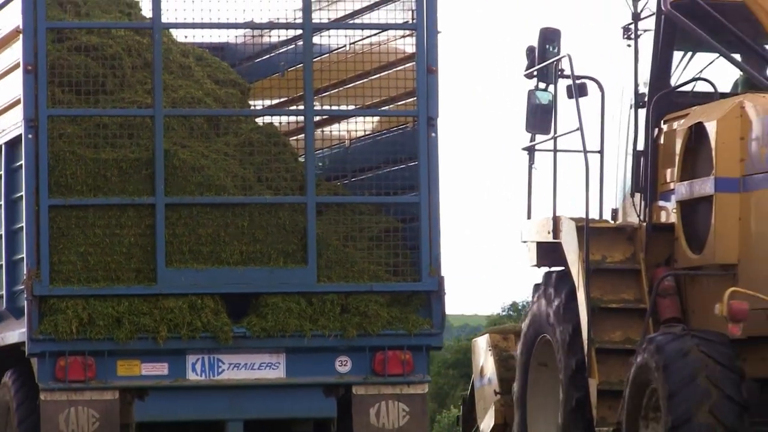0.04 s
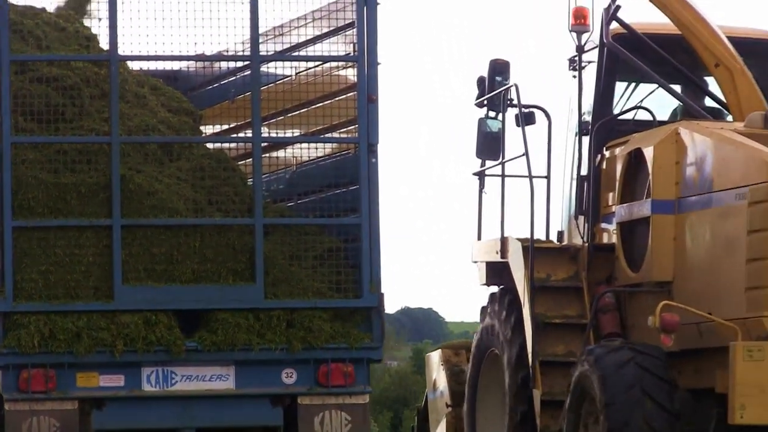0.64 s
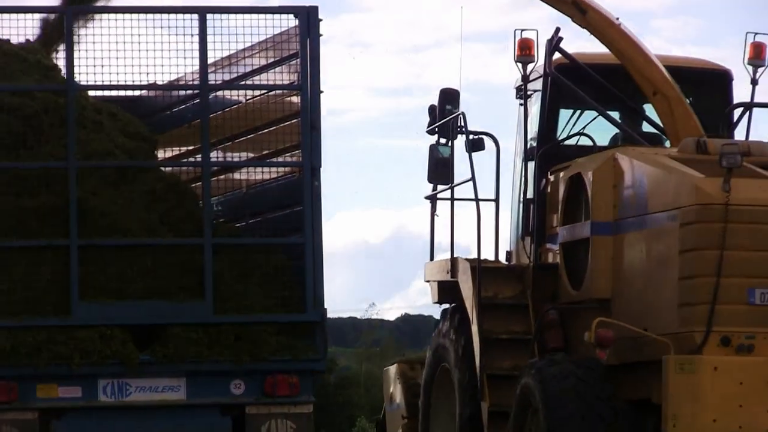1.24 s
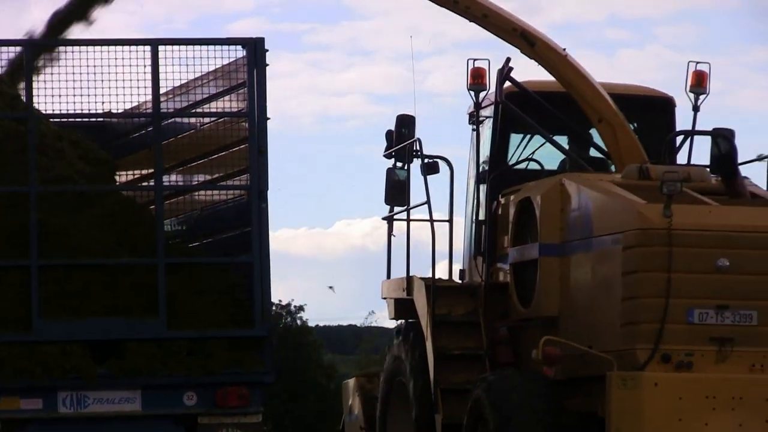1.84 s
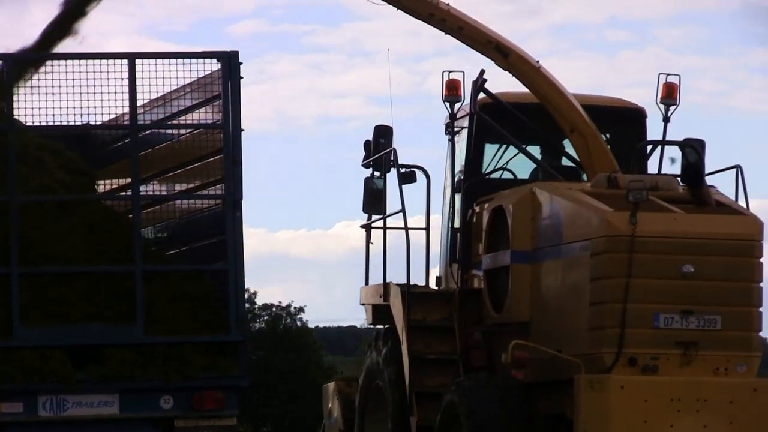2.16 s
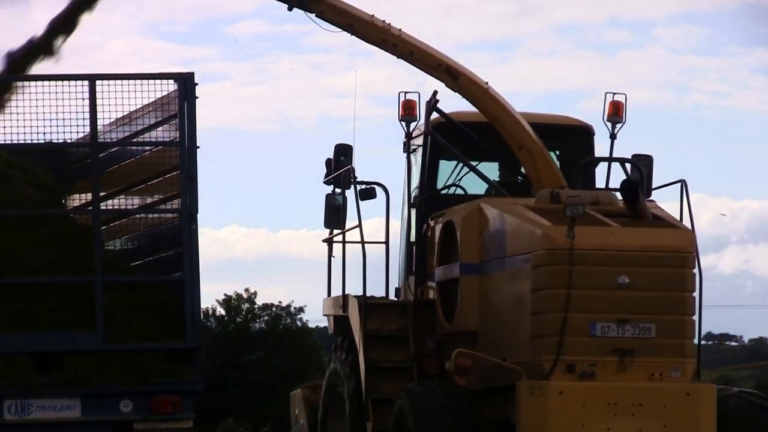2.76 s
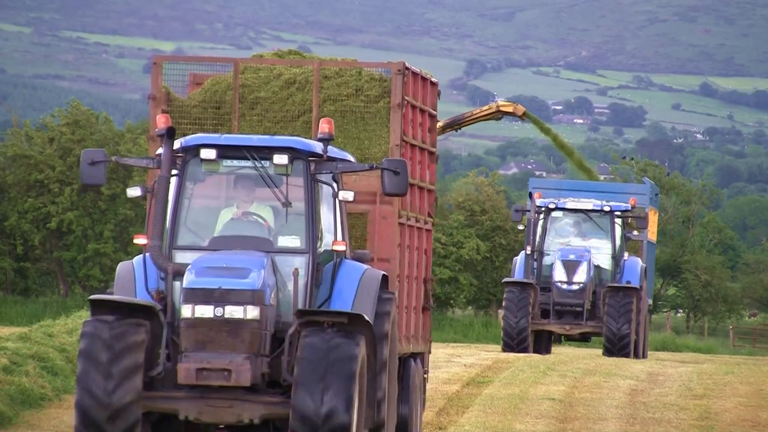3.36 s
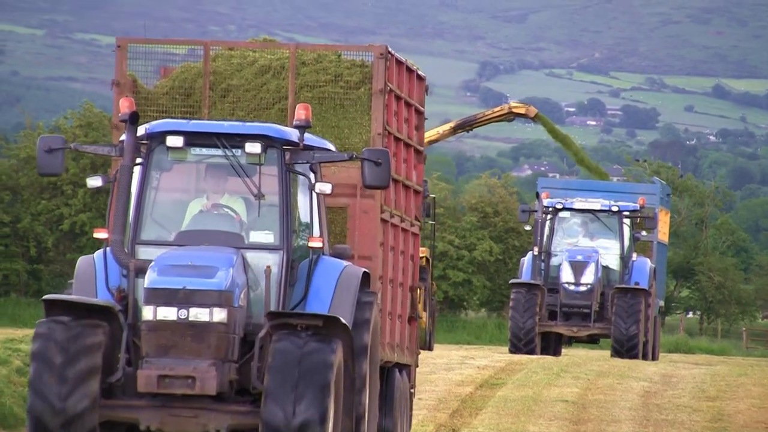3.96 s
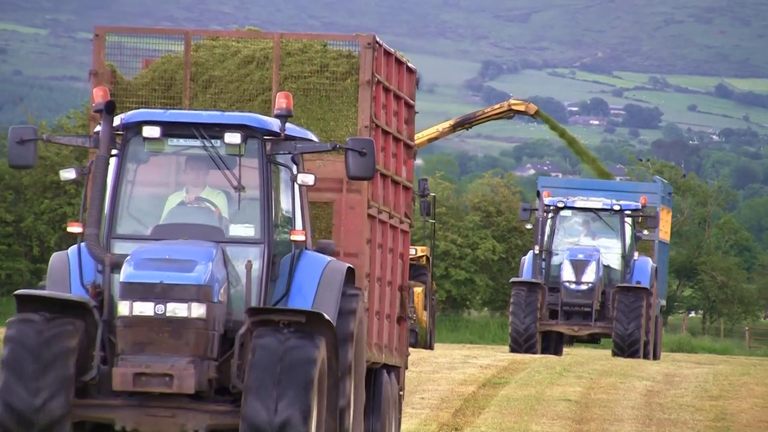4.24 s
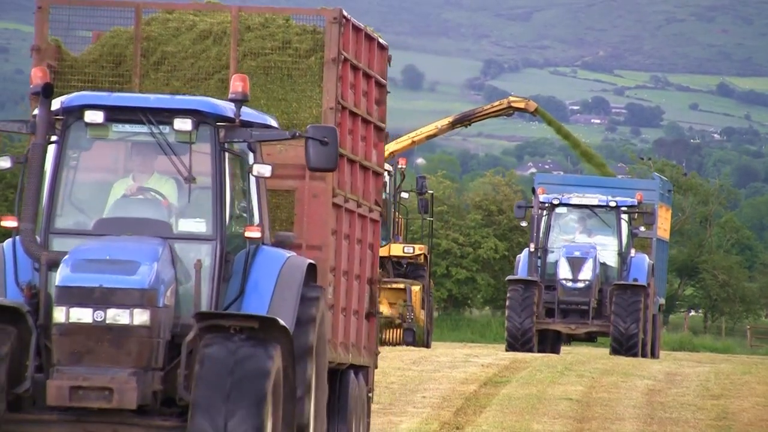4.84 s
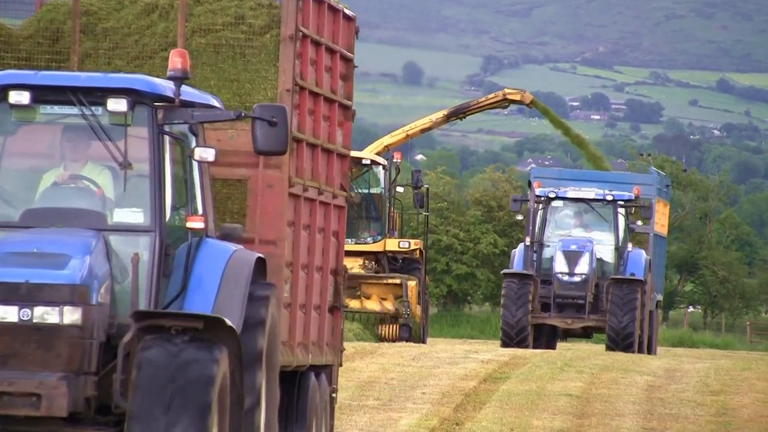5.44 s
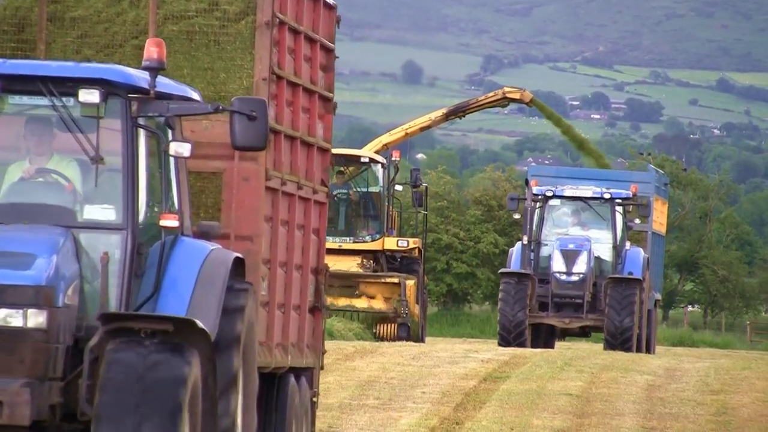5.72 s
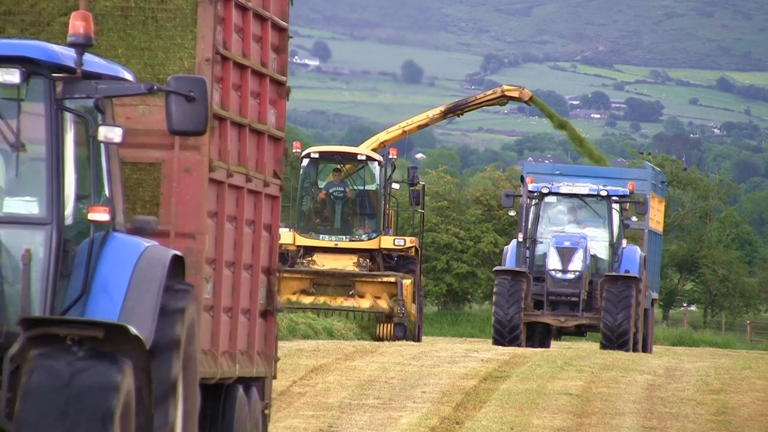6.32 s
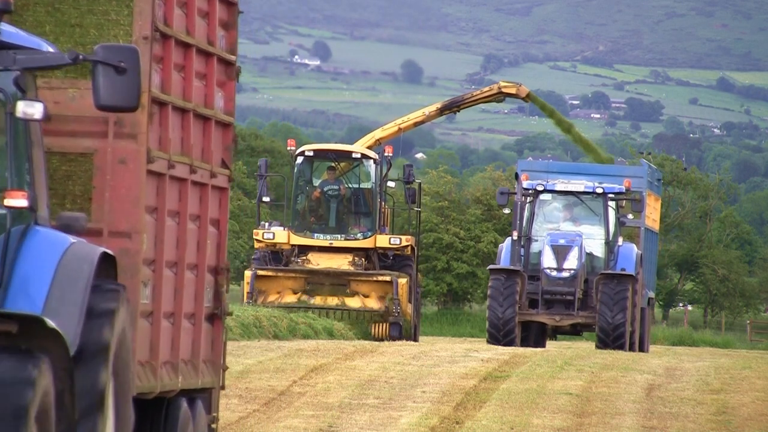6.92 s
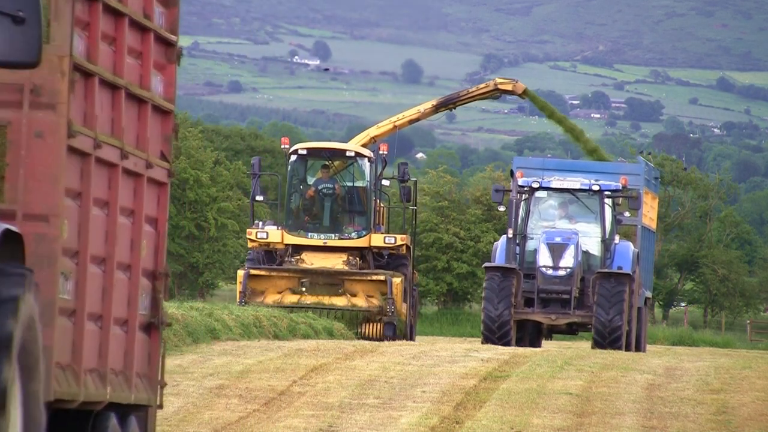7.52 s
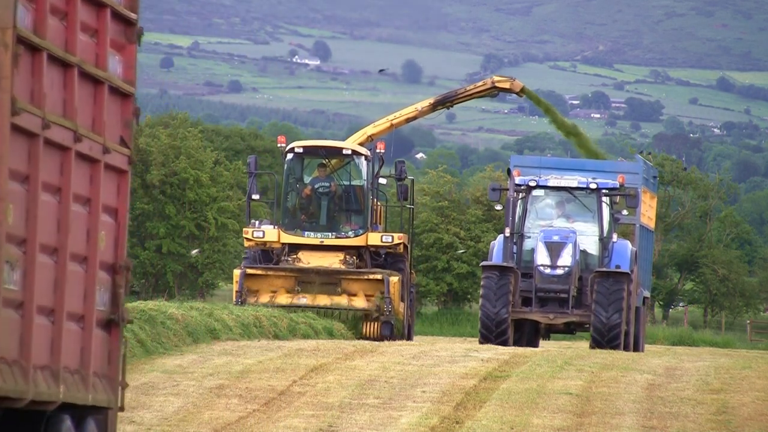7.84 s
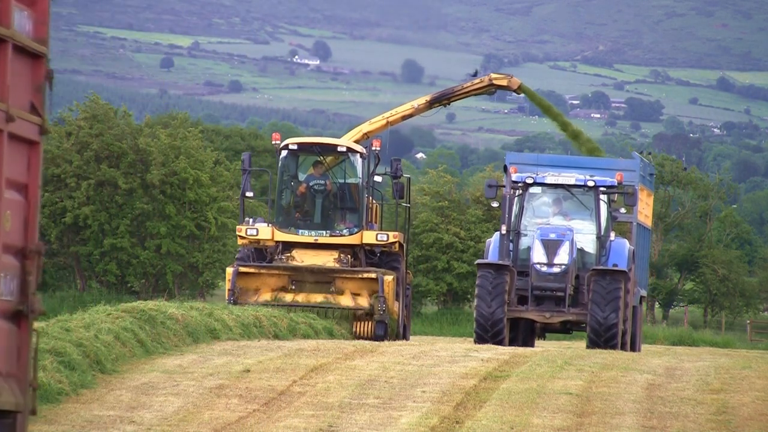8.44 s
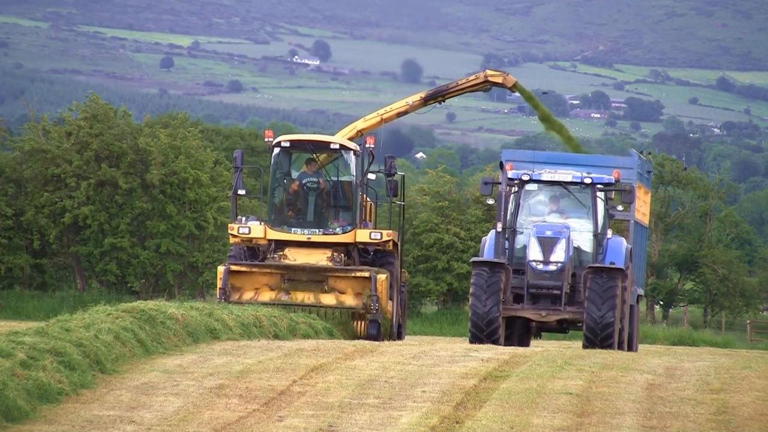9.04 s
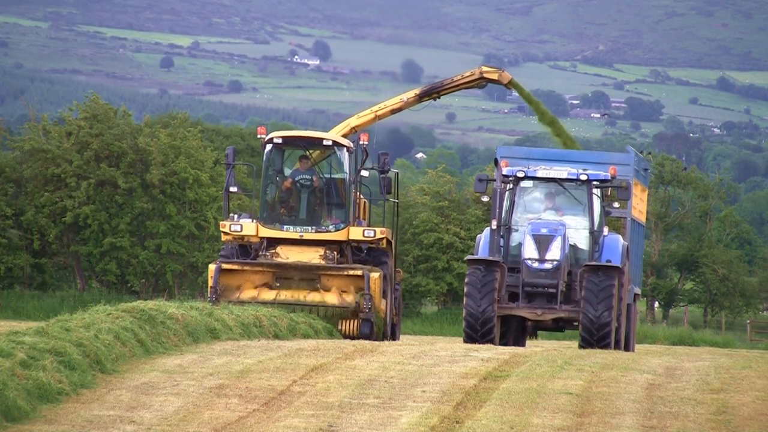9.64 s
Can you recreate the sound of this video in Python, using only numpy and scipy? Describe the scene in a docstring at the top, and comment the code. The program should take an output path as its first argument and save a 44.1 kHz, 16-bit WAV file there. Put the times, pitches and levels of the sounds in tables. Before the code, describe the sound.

A forage harvester roars and sprays chopped grass amid droning diesel engines, then a loaded tractor drives past as the harvester approaches.

```python
"""A field at silage harvest, heard from two spots. First just behind a forage harvester blowing grass
into a trailer; then a hard cut to further up the field, where a loaded tractor drives past and uncovers
the oncoming harvester. Six-cylinder diesels beat against each other under the roar of chopper and
blower, the whistle of turbos and the hiss of grass pelting the steel spout."""
import sys
import numpy as np
from scipy import signal
from scipy.fft import rfft, irfft
from scipy.io import wavfile
from scipy.ndimage import uniform_filter1d, map_coordinates

SR = 44100
rng = np.random.default_rng(int(sys.argv[2]) if len(sys.argv) > 2 else 0)


def int16_out(signal):
    """Quantize to a 16-bit WAV file."""
    q = np.round(np.clip(np.atleast_2d(signal).T, -1, 1) * 32767)
    wavfile.write(sys.argv[1], SR, q.astype(np.int16))


N = 426888
T = np.arange(N) / SR
BINS = np.maximum(np.arange(N // 2 + 1) * SR / N, 1)  # f/Hz
CUT_S, OPEN_S = 2.966, 9.05  # cut to the second spot; harvester fully in the open
PASS_S, SPEED_M_S, SIDE_M = 7.6, 3.1, 5.2  # the loaded tractor abeam: time, speed, distance


def undb(db):
    """Decibels to gain."""
    return 10 ** (np.asarray(db) / 20)


def curves(table):
    """Automation lanes: a table's columns, joined by straight lines in time."""
    times, *columns = np.transpose(table)
    return [np.interp(T, times, column) for column in columns]


def spectra(table):
    """EQ curves: a table's columns, joined by straight lines in log frequency."""
    hz, *columns = np.transpose(table)
    return [np.interp(np.log(BINS), np.log(hz), column) for column in columns]


def walk(rate):
    """Smooth random modulation with spread 1, changing about rate times a second."""
    points = rng.standard_normal(N // 16)
    step = max(int(SR / rate), 16)
    drift = uniform_filter1d(np.interp(np.arange(N) / step, np.arange(len(points)), points), step)
    return drift / drift.std()


def burst(start, length, attack_s, release_s):
    """An envelope that ramps towards 1 from start and releases length seconds after start."""
    return np.clip(np.minimum((T - start) / attack_s, 1 - (T - start - length) / release_s), 0, 1)


def swells(table, attack_s, release_s):
    """A level ride in dB from a table of swells."""
    return sum(db * burst(start, length, attack_s, release_s) for start, length, db in table)


def pan(mono, left_db):
    """Place a source, louder on the left by left_db."""
    return mono * undb(np.array([[.5], [-.5]]) * left_db)


def noise(colour, lead_us, drive=None):
    """Coloured stereo noise, mid rms 1: direct sound leads on the left by lead_us, scatter is diffuse."""
    # stereo image of the microphone pair: f/Hz, left minus right/dB, likeness/0-1
    image = [(30, 4, 0.84), (100, -0.5, 1), (600, -1.7, 0.97), (1220, -1, 0.97), (2270, 3.6, 0.94),
             (3200, 2, 1), (4260, 1, 0.77), (4900, 4, 0.52), (6200, -0.5, 0.83), (7800, -2, 0.9),
             (9200, -8, 0.5), (11000, -8, 0), (12500, -5, 0), (14000, 0, 0)]
    drive = rng.standard_normal(N) if drive is None else drive
    balance_db, likeness = spectra(image)
    sides = np.array([[.5], [-.5]])
    angle = 2 * np.pi * BINS * lead_us / 1e6
    direct = np.sqrt(likeness) * rfft(drive) * np.exp(1j * sides * angle)
    scattered = np.sqrt(1 - likeness) * rfft(rng.standard_normal((2, N)))
    gain = undb(sides * balance_db)
    mono_gain = np.sqrt((gain ** 2).sum(0) + 2 * likeness * np.cos(angle))
    stereo = irfft((direct + scattered) * gain / mono_gain * undb(spectra(colour)[0]), N)
    return stereo / stereo.mean(0).std()


def crank(firing_rates):
    """Four-stroke cycles turned so far (six firings each); the governor hunts a little."""
    return np.cumsum(curves(firing_rates)[0] * (1 + .002 * walk(25))) / SR / 6


def crank_tones(cycles, orders, waver_db, rough):
    """Tones at multiples (orders) of the cycle rate; each wavers in the air, and firings are uneven."""
    tones = 0
    for order, db in orders:
        tones += undb(db + waver_db * walk(5)) * np.sin(2 * np.pi * (order * cycles + rng.random()))
    return np.sqrt(2) * tones * (1 + rough * walk(60))


def knocks(cycles, repeat):
    """Mechanical noise, of which the share repeat comes back on every engine cycle."""
    pattern = rng.standard_normal(2600)
    locked = pattern[(cycles % 1 * len(pattern)).astype(int)]
    return np.sqrt(repeat) * locked + np.sqrt(1 - repeat) * rng.standard_normal(N)


def throb(cycles, depth):
    """Tremolo that swells at each of the six firings."""
    return 1 + depth * np.cos(2 * np.pi * 6 * cycles)


def whistle(hz, width_hz):
    """A narrow band of turbulence, rms 1, around a steady or moving pitch."""
    phase = 2 * np.pi * np.cumsum(hz * np.ones(N)) / SR
    return walk(2 * width_hz) * np.cos(phase) + walk(2 * width_hz) * np.sin(phase)


def diesels(cycles, away):
    """From behind, harvester and tractor drone at different pitches over a growing rumble."""
    # engine and shaft tones of each machine: order, level/dB
    harvester_orders = [(2.85, -25), (5.6, -14.5), (6, -2), (10, -8.5), (11, -6.5), (14, -8.5), (18, -8.5),
                        (21, -7.5), (23.85, -13)]
    tractor_orders = [(6, 0), (12, -16), (18, -16)]
    # the tractor's firing rate: t/s, f/Hz
    tractor_revs = [(0.0, 119.0), (0.5, 118.9), (0.64, 116.6), (1.71, 116.4), (1.81, 115.1), (2.96, 115.1)]
    # the harvester's rumble: f/Hz, level/dB
    rumble_eq = [(15, -42), (40, -34), (58, -13), (66, -6), (85, -17), (100, -3.5), (200, 1.5), (350, 1.5),
                 (430, -2.5), (520, -11.5), (620, -23.5), (800, -54)]
    drone = undb(-23) * crank_tones(cycles, harvester_orders, waver_db=2.4, rough=.048)
    drone += undb(-23.5) * crank_tones(crank(tractor_revs), tractor_orders, waver_db=1.5, rough=.05)
    rumble = noise(rumble_eq, lead_us=-8, drive=knocks(cycles, repeat=.21))
    return pan(drone, left_db=-2) + undb(-19.5 + 2.2 * away) * rumble


def blower(cycles, away):
    """The blower's throbbing roar; the ground echo cancels other bands as the machine recedes."""
    # the roar close up and further off: f/Hz, level/dB
    close_eq = [(450, -7.5), (630, -14.5), (770, 1.5), (940, 1), (1120, 2.5), (1620, -6.5), (1860, -1),
                (2100, -11), (2600, -13), (3000, -9), (3600, -10), (4000, -18.5), (4700, -29),
                (6500, -37.5)]
    far_eq = [(450, -30), (630, -15), (790, 1.5), (920, -1), (1120, 2.5), (1350, 1), (1560, -1.5),
              (1820, -0.5), (2300, -5), (3050, -14.5), (3700, -10.5), (4300, -13.5), (4900, -36),
              (6500, -36)]
    roar = np.sqrt(1 - away) * noise(close_eq, lead_us=-21, drive=knocks(cycles, repeat=.21))
    roar += np.sqrt(away) * noise(far_eq, lead_us=2, drive=knocks(cycles, repeat=.064))
    return roar * undb(-16.5 + .85 * walk(40.15)) * throb(cycles, depth=.13)


def grass(lead_us, grain_db, clump_db):
    """Chopped grass pelts the steel spout: a grainy hiss that comes in clumps."""
    # the spray: f/Hz, level/dB
    spray_eq = [(3000, -5), (4800, 7.5), (6200, 4.5), (6600, 3), (7200, 5.5), (8000, -1), (9400, -1),
                (10000, -5.5), (12000, -0.5), (13000, -17), (15000, -52.5)]
    pelting = undb(grain_db * walk(900) + clump_db * walk(45))
    return noise(spray_eq, lead_us) * pelting / np.sqrt(np.mean(pelting ** 2))


def close_spray(cycles):
    """The spray at close range, flaring as thick wads of grass go up the spout."""
    # wads: t/s, length/s, boost/dB
    wads = [(0.17, .06, 1), (0.48, 0.038, 5), (1.17, .28, 1), (1.89, .08, 4), (2.07, .2, 2),
            (2.46, .08, 2.5), (2.69, .04, 4), (2.86, 0.097, 3.5)]
    gain = undb(-36 + swells(wads, attack_s=.013, release_s=.064))
    return gain * grass(lead_us=-37, grain_db=1, clump_db=.5) * throb(cycles, depth=.076)


def harvester_turbo():
    """A turbo whistle and a thin whine, both creeping up in pitch and level."""
    # whistle and whine: f/Hz, width/Hz, level/dB
    bands = [(13600, 560, -46.5), (8350, 70, -54)]
    spool, rise_db_per_s = 1 + .004 * T, 1
    return sum(undb(db + rise_db_per_s * T) * whistle(hz * spool, width) for hz, width, db in bands)


def rasps(cycles):
    """Grass scrapes through blower and spout and sets their panels ringing in surges."""
    # scrapes: t/s, length/s, f/Hz, level/dB
    scrapes = [(0.448, 0.083, 3000, -29), (0.46, 0.19, 3520, -32), (1.0, 0.41, 3520, -33),
               (1.32, 0.17, 1880, -26.5), (1.87, .1, 3200, -32), (2.046, 0.26, 1850, -27.5)]
    rings = sum(undb(db) * burst(start, length, attack_s=.044, release_s=.07) * whistle(hz, .075 * hz)
                for start, length, hz, db in scrapes)
    return pan(rings * throb(cycles, depth=.32), left_db=5)


def behind():
    """First spot: close behind the harvester and its tractor, which slowly draw away."""
    # the harvester's firing rate: t/s, f/Hz
    revs = [(0, 101.9), (2.96, 98.8)]
    cycles = crank(revs)
    away = np.clip(T / CUT_S, 0, 1)
    machines = diesels(cycles, away) + blower(cycles, away)
    return machines + close_spray(cycles) + harvester_turbo() + rasps(cycles)


def breeze():
    """A light breeze rumbles below 30 Hz on each microphone separately."""
    gusts = irfft(rfft(rng.standard_normal((2, N))) / (1 + (BINS / 30) ** 4), N)
    return undb(-60 + 2 * walk(2.7)) * gusts / gusts.std()


def passing_tones(cycles, close):
    """The loaded tractor's exhaust heaves and growls; its gears whine abeam, its transmission astern."""
    # exhaust drone: t/s, level/dB
    drone_ride = [(3, -24), (3.25, -26.5), (3.6, -21), (4.22, -21), (4.39, -23), (4.54, -20.5),
                  (4.98, -22.5), (5.18, -19), (5.41, -24), (6.14, -21), (6.75, -21), (7.05, -19),
                  (8.1, -20), (9.68, -20)]
    # exhaust, transmission and gear tones: order, level/dB
    drone_orders = [(6, 0.5), (12, -7.5), (18, -16.5), (21, -20.5), (156, -55)]
    rear_orders = [(60, -34)]
    gear_orders = [(48, -36.5), (68, -38), (92, -39)]
    # growl that grows as it nears: order, level abeam/dB, exponent of closeness
    growl_orders = [(9, -36, .3), (14, -37, .2), (20, -35, .7), (22, -37, .7), (25, -37, 1.8)]
    gone_by = np.clip((T - 8.1) / .35, 0, 1)
    abeam = burst(7.3, .95, attack_s=.35, release_s=.25)
    tones = undb(curves(drone_ride)[0]) * crank_tones(cycles, drone_orders, waver_db=.4, rough=.19)
    tones += gone_by * crank_tones(cycles, rear_orders, waver_db=5.5, rough=.087)
    tones += abeam * crank_tones(cycles, gear_orders, waver_db=1.2, rough=.1)
    for order, db, power in growl_orders:
        tones += close ** power * crank_tones(cycles, [(order, db)], waver_db=2, rough=.25)
    return pan(tones, left_db=-1.9)


def passing_noise(cycles, close):
    """Exhaust boom and diesel clatter; the open engine flank beams sideways, so it is heard abeam."""
    # boom, clatter and flank: f/Hz, level/dB
    boom_eq = [(15, -34), (42, -15), (62, 0), (82, -6), (105, 8.5), (170, 4), (230, 0), (275, -0.5),
               (400, -56)]
    clatter_eq = [(300, -40), (480, -13.5), (620, -6), (720, -7.5), (860, -1), (1020, -5), (1250, 2.5),
                  (1570, -1.5), (1800, -0.5), (2500, -1), (3100, -4.5), (3700, -11), (4300, -19),
                  (6000, -77)]
    flank_eq = [(200, -22), (300, -24), (345, 10), (420, 7), (480, -13), (620, -42), (2000, -40),
                (2700, -3.5), (3300, 0), (3900, -12), (6000, -68)]
    # clatter grows as it clears the slope ahead, fades behind its own trailer: t/s, level/dB
    clatter_ride = [(3.3, -27.5), (4.2, -25), (6.4, -25.5), (8.6, -24.5), (9.3, -25.5)]
    boom = undb(-26) * noise(boom_eq, lead_us=5, drive=knocks(cycles, repeat=.14))
    clatter = noise(clatter_eq, lead_us=25, drive=knocks(cycles, repeat=.37)) * throb(cycles, depth=.04)
    clatter *= undb(curves(clatter_ride)[0] + .41 * walk(35))
    flank = noise(flank_eq, lead_us=6.6, drive=knocks(cycles, repeat=.16))
    return boom + clatter + undb(-26.5) * close ** 2.2 * flank


def engine_covers(doppler):
    """The loaded tractor's covers ring, sliding down in pitch as it passes."""
    # panel resonances: f/Hz, width/Hz, level/dB
    modes = [(1573, 75, -37.5), (2646, 70, -42)]
    return pan(sum(undb(db) * whistle(hz * doppler, width) for hz, width, db in modes), left_db=2.5)


def ground_comb(sound, close):
    """A dull, inverted echo off the ground sweeps a comb through the passing sound."""
    # the echo's lag: t/s, delay/s
    lag = [(3, .00036), (6, .00036), (6.7, .00039), (7, .00042), (7.5, .000465), (7.9, .000515),
           (8.5, .000565), (9.3, .0007), (9.68, .00072)]
    stubble_hz = 8800  # the stubble scatters what is higher
    dull = irfft(rfft(sound) / (1 + (BINS / stubble_hz) ** 8), N)
    echo = np.array([map_coordinates(side, [(T - curves(lag)[0]) * SR], order=3) for side in dull])
    return sound - (.18 + .13 * close) * echo


def intake_hiss(cycles, close):
    """Injectors and intake hiss once a firing and ring the grille, which faces forward."""
    # hiss and grille resonances: f/Hz, level/dB
    hiss_eq = [(3000, -7), (4400, 2), (5500, 3.5), (7100, -1.5), (8100, -5), (9800, -9.5), (11300, -15),
               (12500, -19), (15000, -52)]
    grille_eq = [(3800, -22), (4200, 1), (4550, 3), (5000, -9), (5500, -11), (5900, -3), (6250, -21),
                 (6600, -7), (7000, -6), (7600, -35)]
    # swells, longest as the engine goes by: t/s, length/s, boost/dB
    surges = [(4.05, .25, 2), (5.1, 0.073, 2.5), (5.6, 0.49, 2.5), (6.52, 2.8, 4), (7.25, .6, 0.5)]
    hiss = noise(hiss_eq, lead_us=3.1, drive=knocks(cycles, repeat=.29)) * throb(cycles, depth=.26)
    facing = np.clip((PASS_S - T) * SPEED_M_S / SIDE_M * np.sqrt(close), 0, 1)
    grille = noise(grille_eq, lead_us=3, drive=knocks(cycles, repeat=.3)) * undb(-4 + 2 * walk(5))
    level_db = -42 + 3.6 * close + swells(surges, attack_s=.11, release_s=.21) + .55 * walk(50)
    return undb(level_db) * (ground_comb(hiss, close) + facing * grille)


def loaded_tractor():
    """The drive-by: engine tones and noise, ringing covers, hiss and a turbo spooling down and up."""
    # firing rate: t/s, f/Hz
    revs = [(2.98, 102.9), (3.6, 104.9), (4.9, 104.9), (5.8, 102.2), (7.44, 103), (8, 99.1), (8.55, 96.7),
            (9.68, 93.4)]
    # turbo whistle: t/s, f/Hz, level/dB
    spool = [(5.4, 10530, -80), (5.58, 10250, -58), (5.8, 9850, -67), (6.15, 9480, -63), (6.3, 9600, -70),
             (6.55, 9935, -62), (7.2, 10420, -60), (7.5, 10570, -62), (7.85, 10070, -59), (8.2, 9600, -75)]
    cycles = crank(revs)
    along = SPEED_M_S * (T - PASS_S)
    distance = np.hypot(along, SIDE_M)
    close = (SIDE_M / distance) ** 2  # closeness, 1 abeam
    doppler = 1 - SPEED_M_S / 343 * along / distance
    engine = passing_tones(cycles, close) + passing_noise(cycles, close) + engine_covers(doppler)
    turbo_hz, turbo_db = curves(spool)
    turbo = undb(turbo_db) * whistle(turbo_hz, width_hz=60)
    return engine + pan(turbo, left_db=-13) + intake_hiss(cycles, close)


def uncovered(open_db, rise_db_per_s):
    """Gain of a harvester sound that climbs steadily out of the trailer's shadow, then holds."""
    return undb(open_db - rise_db_per_s * np.maximum(OPEN_S - T, 0))


def oncoming_tones(cycles):
    """The harvester's drone bends round the trailer; more engine tones, then gears, come into the open."""
    # drone, shadowed engine tones and gear whine: order, level/dB
    drone_orders = [(4, -12), (7, -21), (8, -9.5), (10, 1), (14, -15), (20, -25), (22, -19.5), (25, -31)]
    open_orders = [(9, -7), (10, -8), (12, -1), (14, -10), (15, -7), (16, -3.5), (18, 0), (21, -10),
                   (24, -8), (25, -8), (28, -11)]
    gear_orders = [(58, -10), (79, -6), (81, -4)]
    tones = undb(-26.5) * crank_tones(cycles, drone_orders, waver_db=1.1, rough=.25)
    tones += uncovered(-25, rise_db_per_s=8.5) * crank_tones(cycles, open_orders, waver_db=.1, rough=.28)
    tones += uncovered(-33, rise_db_per_s=21) * crank_tones(cycles, gear_orders, waver_db=6, rough=.11)
    return pan(tones, left_db=-3)


def cutter_drum():
    """Knives pass the shear bar; uneven grass roughens their tone to a howl, which firms in the open."""
    # the howl, dipping under load: t/s, f/Hz, level/dB
    drum = [(3, 1290, -52), (5.5, 1280, -45), (6.65, 1270, -35), (7.4, 1272, -33), (7.7, 1243, -32.5),
            (8.3, 1243, -31.5), (8.55, 1267, -32), (9.1, 1281, -28.3), (9.68, 1268, -28.7)]
    hz, db = curves(drum)
    phase = 2 * np.pi * np.cumsum(hz + 2 * walk(12)) / SR
    tone = uncovered(.6, rise_db_per_s=.5) * undb(.5 * walk(9)) * np.sin(phase)
    howl = undb(-8) * whistle(hz, width_hz=100) + undb(-14) * whistle(2 * hz, width_hz=160)
    return pan(undb(db) * (tone + howl), left_db=-3)


def oncoming_harvester():
    """The harvester emerges from behind the trailer: rumble first, then chopper, last spray and turbo."""
    # firing rate: t/s, f/Hz
    revs = [(2.98, 104.6), (4.3, 104.3), (6.1, 100.2), (7.44, 99.3), (8.8, 95.5), (9.2, 94), (9.68, 93.3)]
    # rumble and chopper roar: f/Hz, level/dB
    rumble_eq = [(100, -22), (180, 0.5), (240, 5.5), (280, 0), (370, -0.5), (425, -7), (475, -45),
                 (700, -57)]
    chopper_eq = [(300, -32), (450, 4), (620, -6.5), (740, 0.5), (950, -1.5), (1040, 0), (1350, 4.5),
                  (1580, 1.5), (1780, -3), (2450, 2), (3350, -7.5), (3800, -11.5), (4300, -17.5),
                  (6000, -41)]
    cycles = crank(revs)
    tones = oncoming_tones(cycles)
    rumble = noise(rumble_eq, lead_us=5, drive=knocks(cycles, repeat=.2))
    rumble *= uncovered(-23.5, rise_db_per_s=1.15)
    chopper = noise(chopper_eq, lead_us=68, drive=knocks(cycles, repeat=.38)) * throb(cycles, depth=.14)
    chopper *= uncovered(-20.5, rise_db_per_s=4) * undb(.2 * walk(35))
    spray = uncovered(-38, rise_db_per_s=10) * grass(lead_us=43, grain_db=3, clump_db=1.6)
    drum = cutter_drum()
    turbo = uncovered(-54, rise_db_per_s=17) * whistle(13700, width_hz=1600)
    return tones + rumble + chopper + spray + drum + turbo


def tractor_alongside():
    """A tractor keeps pace under the spout; its drone swells and beats against the other engines."""
    # firing rate: t/s, f/Hz
    revs = [(2.98, 116), (3.48, 124), (3.92, 113.8), (4.6, 120.8), (5.2, 117.3), (6.1, 117.8), (7.4, 121.6),
            (8.7, 119), (9.68, 121.3)]
    # exhaust tones: order, level/dB
    orders = [(6, 1), (12, -17), (18, -20)]
    # swells of the drone: t/s, length/s, boost/dB
    surges = [(3.48, 0.39, 8), (4.45, 0.7, 7), (5.6, 0.68, 7.5), (7.05, .62, 4), (8.15, 0.46, 7.5)]
    gain = undb(-30 + swells(surges, attack_s=.026, release_s=.1))
    return pan(gain * crank_tones(crank(revs), orders, waver_db=.3, rough=.15), left_db=-1)


def scene():
    """A 4 ms crossfade cuts from behind the harvester to up the field; the breeze runs under both."""
    cut = np.clip((T - CUT_S) / .004 + .5, 0, 1)
    first_spot = behind()
    second_spot = loaded_tractor() + oncoming_harvester() + tractor_alongside()
    return (1 - cut) * first_spot + cut * second_spot + breeze()


def record(dry):
    """A 3 ms fade-in; the microphone rounds the highest peaks and cuts the top above 15 kHz."""
    rounded = np.minimum(T / .003, 1) * np.tanh(.5 * dry) / .5
    return signal.sosfilt(signal.ellip(10, .2, 90, 15000, fs=SR, output="sos"), rounded)


dry = scene()
out = record(dry)
int16_out(out)
```